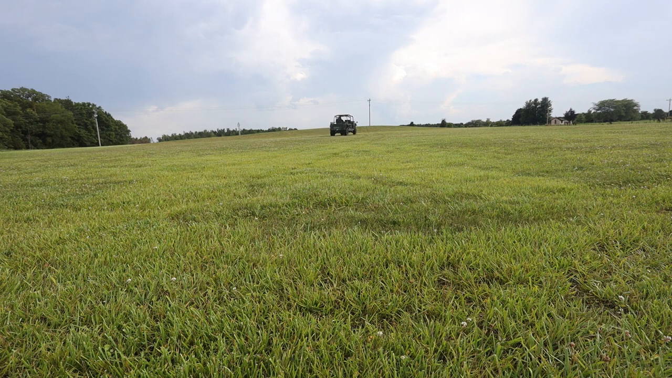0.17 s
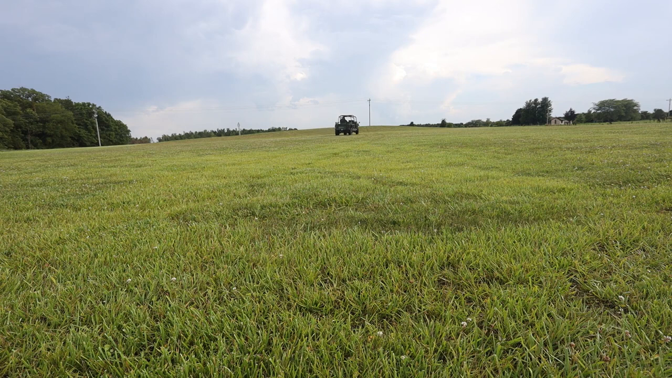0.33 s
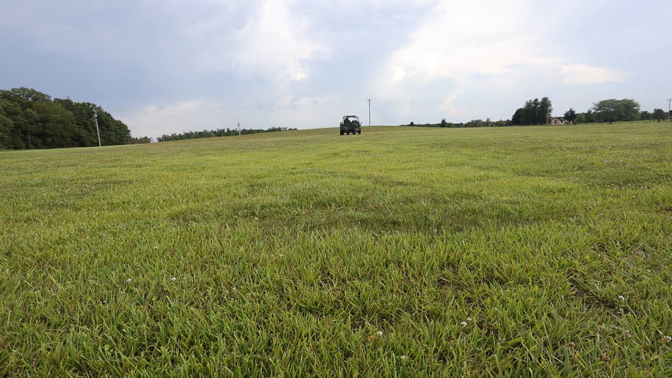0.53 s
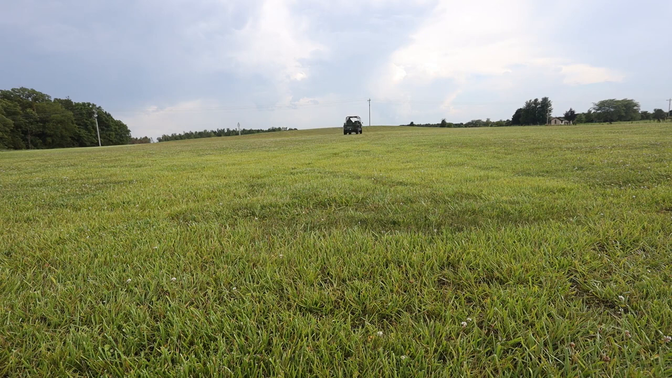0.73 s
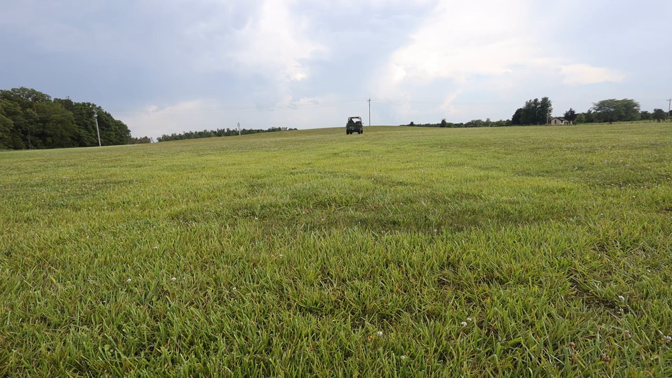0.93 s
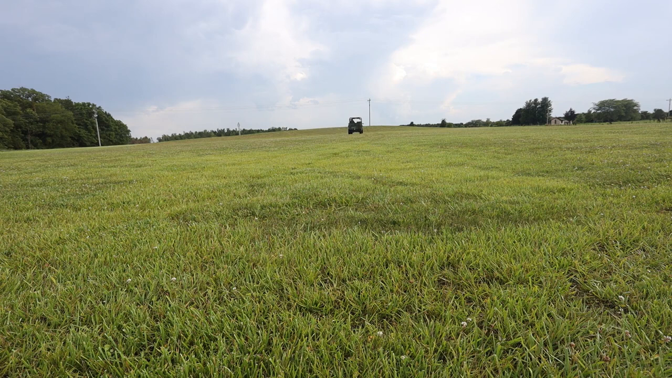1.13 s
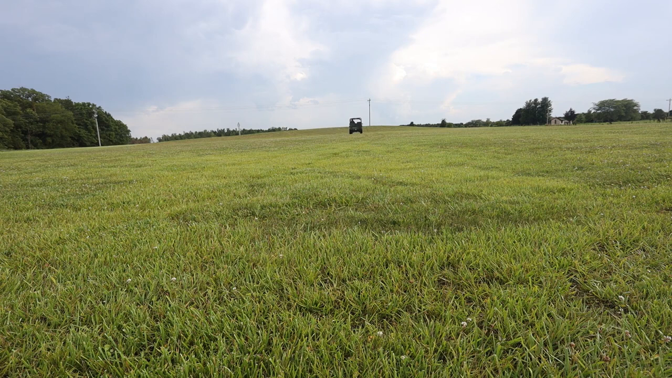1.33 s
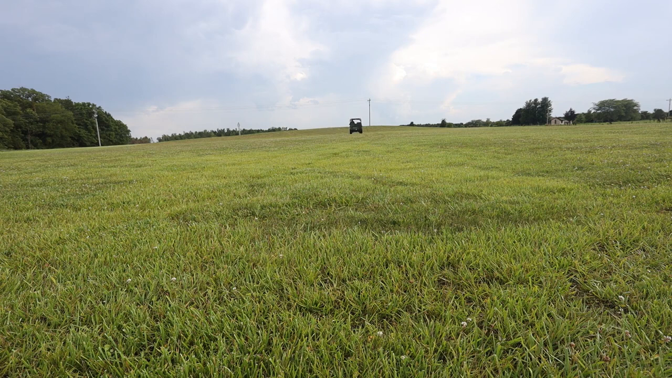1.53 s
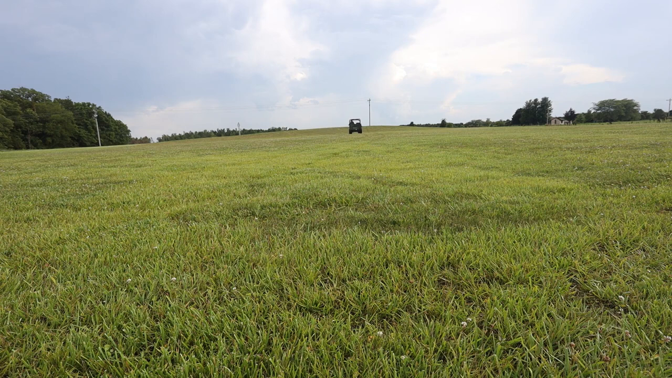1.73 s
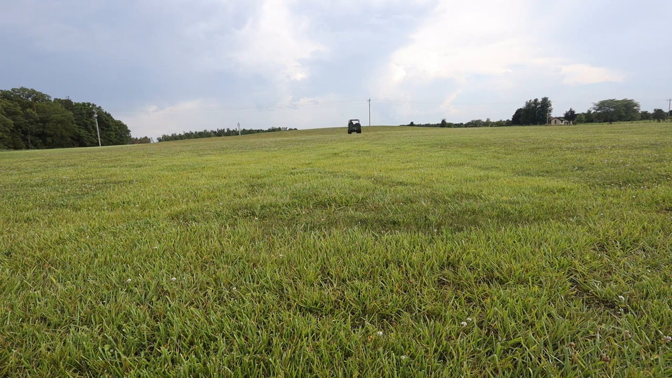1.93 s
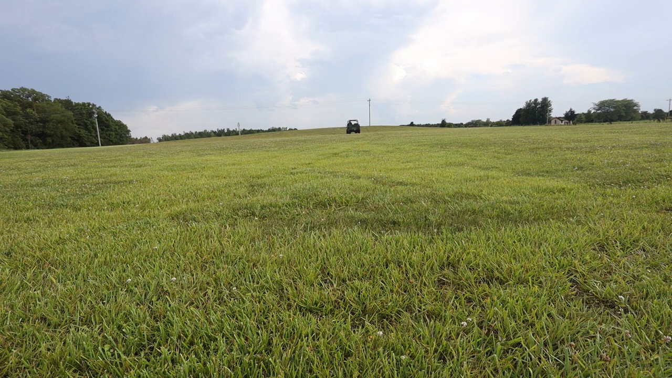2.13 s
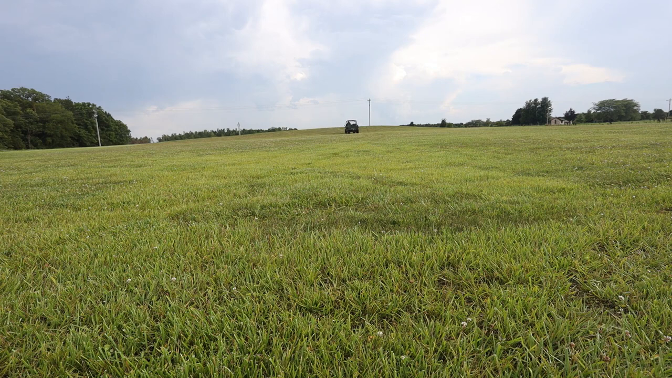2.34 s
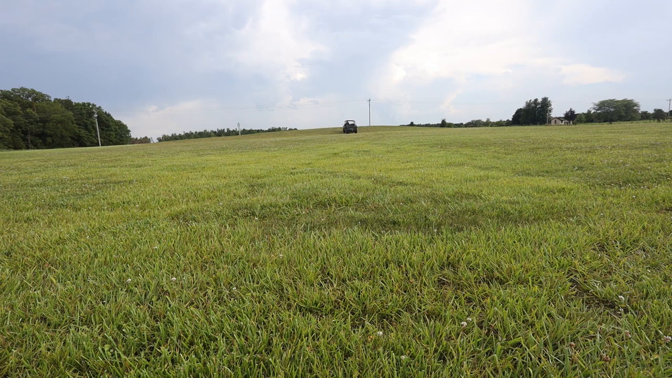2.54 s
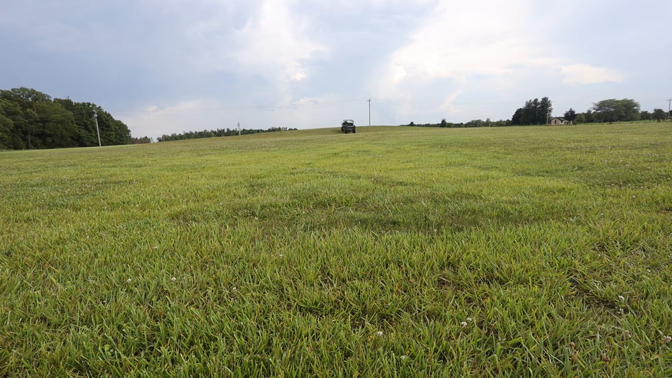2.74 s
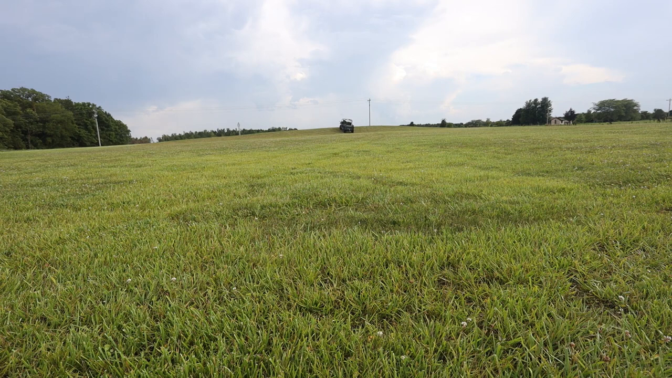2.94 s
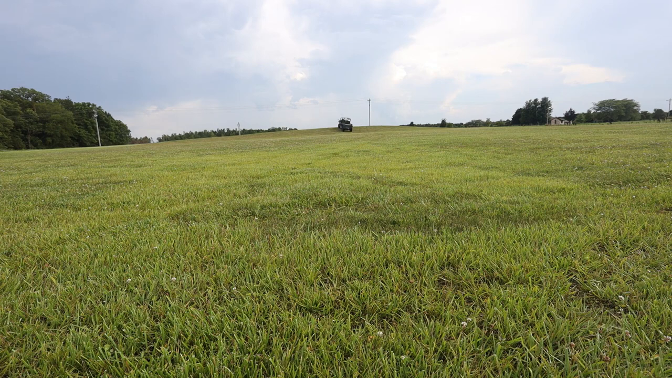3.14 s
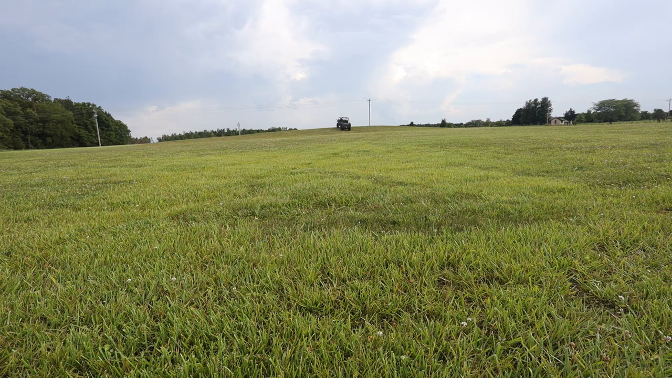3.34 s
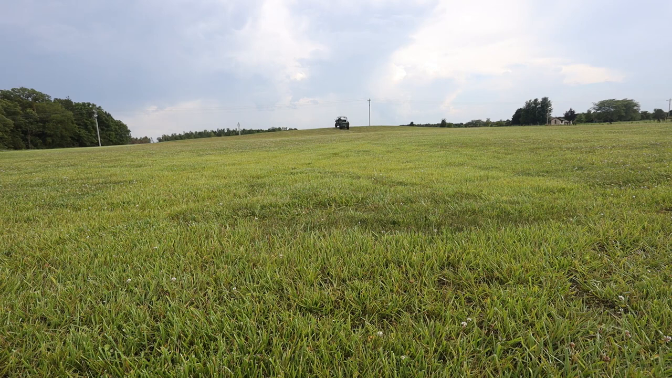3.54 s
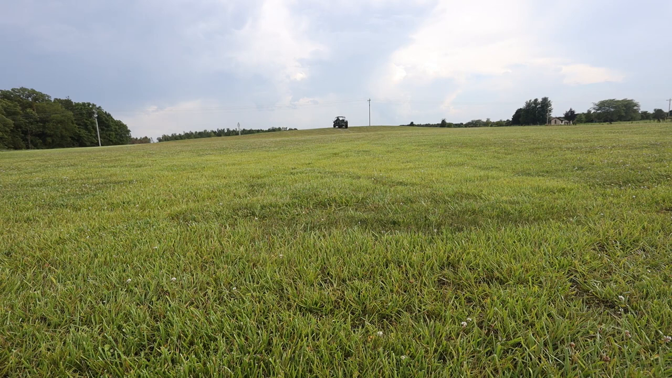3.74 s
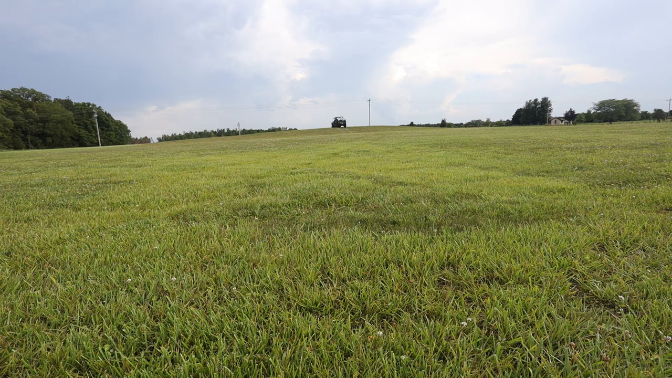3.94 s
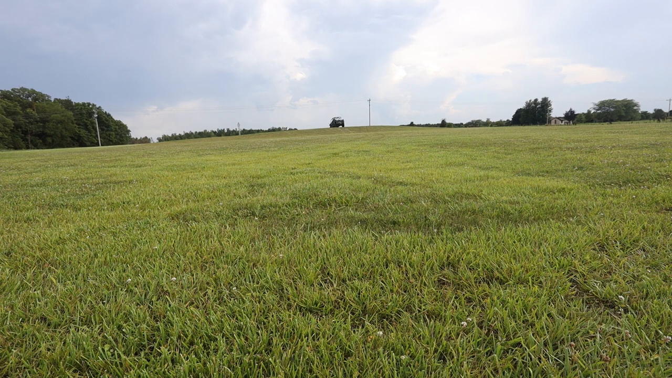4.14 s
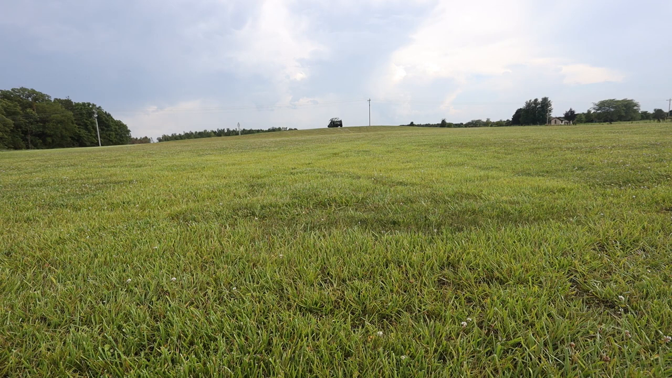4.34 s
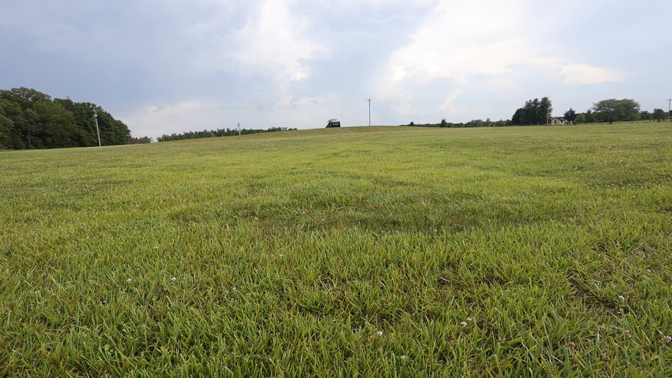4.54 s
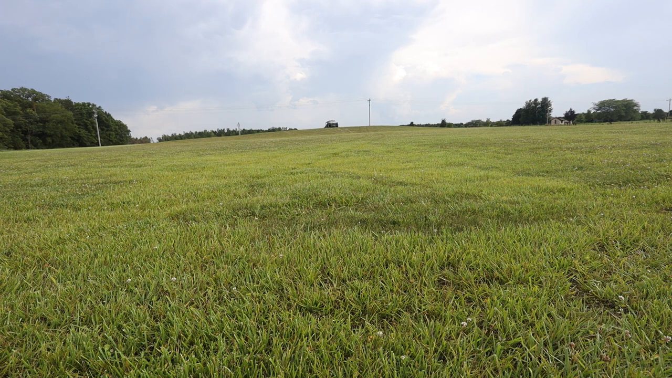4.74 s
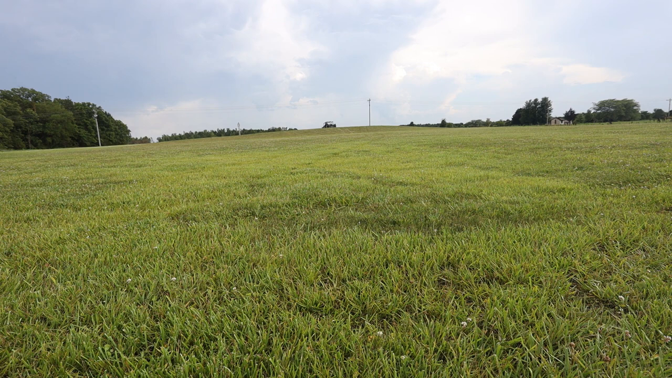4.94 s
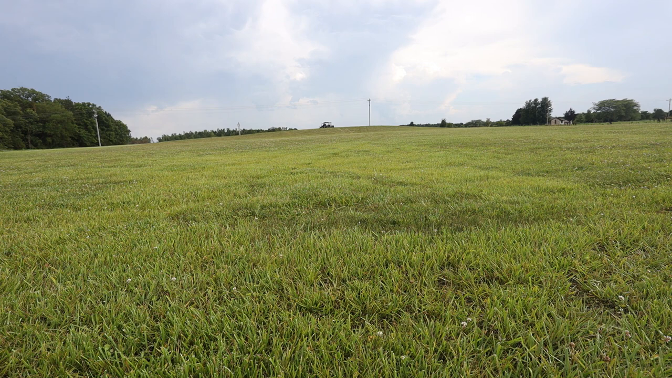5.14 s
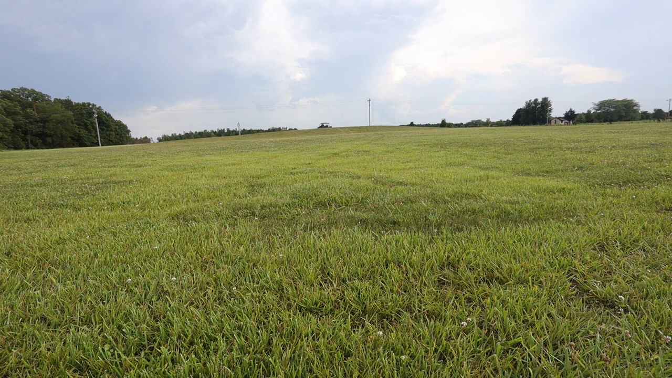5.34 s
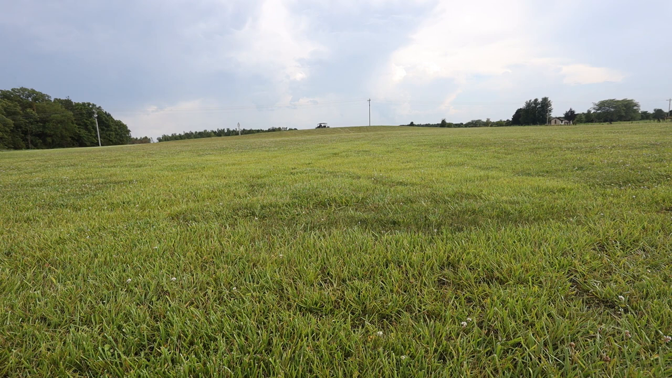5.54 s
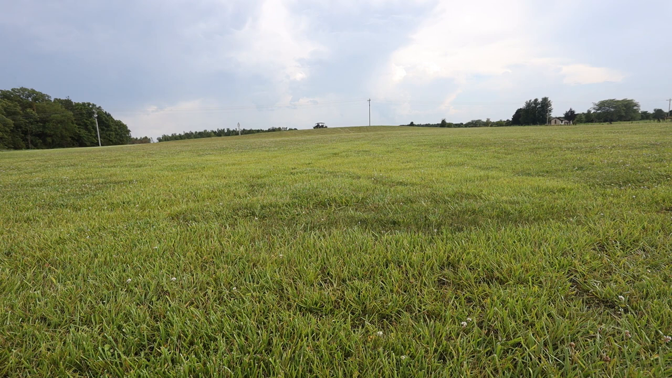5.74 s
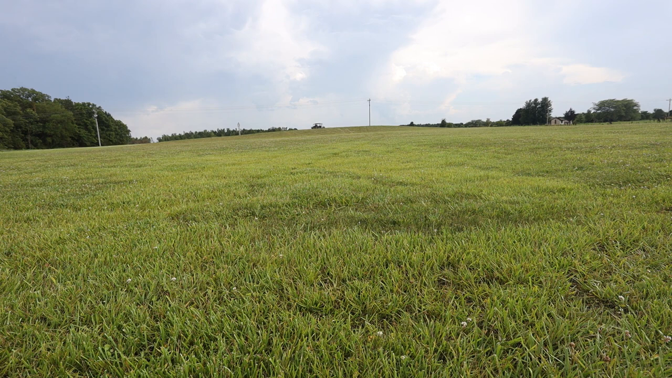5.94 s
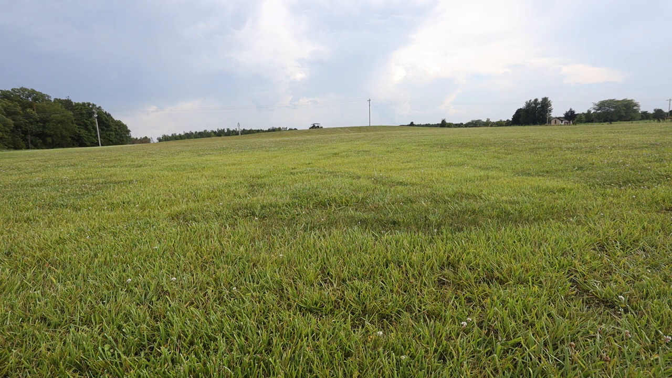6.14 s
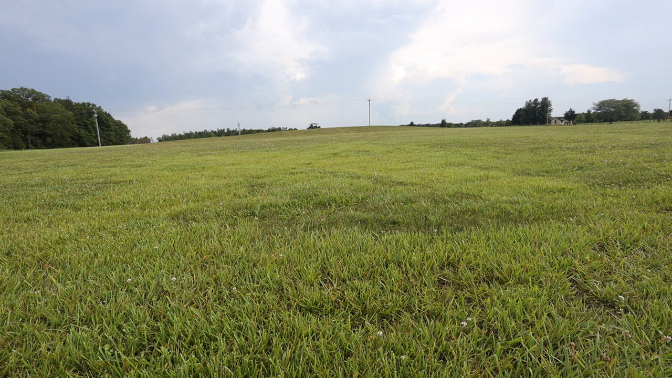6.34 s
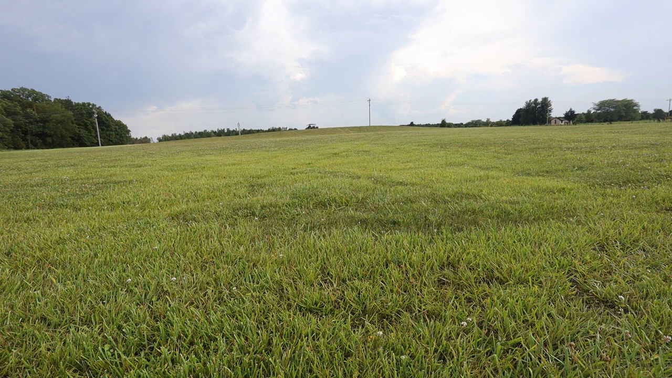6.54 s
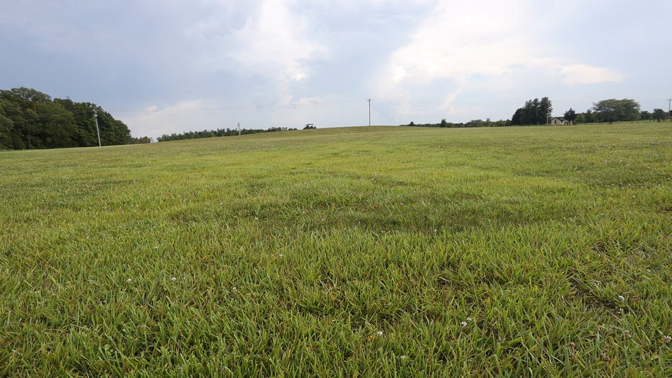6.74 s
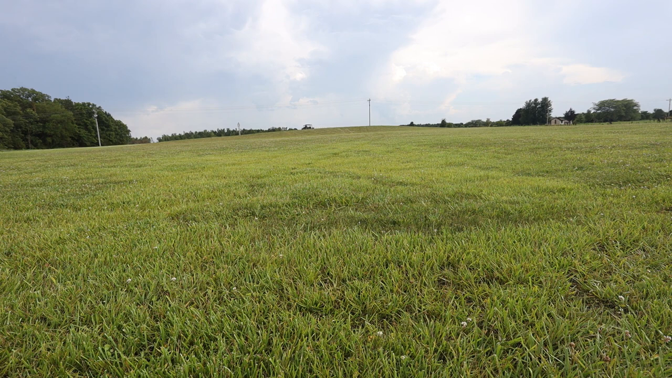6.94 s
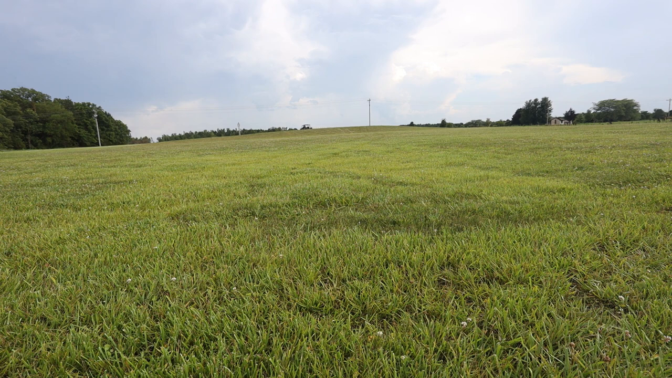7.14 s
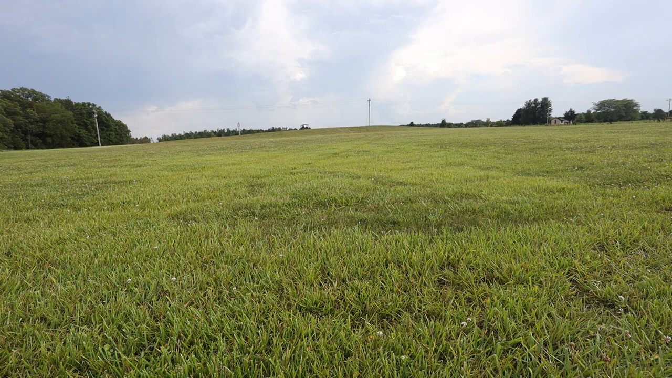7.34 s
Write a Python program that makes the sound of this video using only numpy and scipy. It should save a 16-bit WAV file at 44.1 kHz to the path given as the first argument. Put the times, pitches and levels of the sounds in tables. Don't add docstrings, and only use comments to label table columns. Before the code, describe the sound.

A rough four-cylinder off-road vehicle growls away across grass, eases off to a low idle-like rumble, then revs again amid sharp bodywork rattles.

```python
import sys
import numpy as np
from scipy import signal
from scipy.io import wavfile
from scipy.ndimage import uniform_filter1d

SR = 44100
rng = np.random.default_rng(int(sys.argv[2]) if len(sys.argv) > 2 else 0)


def transcribe(u):
    v = np.clip(np.atleast_2d(u).T, -1, 1)
    q = np.round(v * 32767).astype(np.int16)
    wavfile.write(sys.argv[1], SR, q)


def volts_from_db(level):
    exponent = np.asarray(level, float) / 20
    return 10 ** exponent


N = 329868
T = np.arange(N) / SR

# time_s, firings_per_s
FIRING_RATE = [(0, 49.5), (1.94, 45.6), (2.37, 43.6), (2.6, 39.3), (2.98, 37.8), (3.54, 30.5), (3.93, 28.9),
               (4.13, 32.3), (4.68, 53.6), (4.94, 56), (5.22, 60.7), (5.55, 62.3), (5.79, 58), (6.23, 62.2),
               (6.43, 56.7), (6.66, 58), (7.15, 50.3), (7.48, 49.3)]
# time_s, level_db
THROTTLE = [(0.0, 0.4), (0.61, 2.0), (1.09, 1.9), (1.29, 0.1), (2.35, -2.2), (2.53, -7.7), (3.01, -10.6),
            (3.56, -16.3), (3.98, -13.3), (4.21, -4.4), (4.66, -3.4), (5.18, -6.9), (5.8, -8.3),
            (6.32, -9.0), (6.46, -5.4), (7.06, -9.7), (7.21, -12.8), (7.48, -13.1)]
# time_s, level_db
FACING = [(0, -1.5), (.9, 0), (1.4, -3), (1.9, -5), (2.5, -12.5), (3.1, -12.5), (3.6, -9.5), (4.1, -9.5),
          (4.46, -9.5), (4.8, -13), (5.4, -13.5), (5.9, -13.5), (6.3, -13.5), (6.6, -13.5), (6.9, -18),
          (7.2, -14.5), (7.48, -19.5)]
# time_s, level_db,
# half_width_s
SURGES = [(1.65, 1, 0.27), (2.7, -1.5, 0.37), (3.12, 0, 0.093), (3.72, 4, 0.053), (4.0, 1.5, 0.1),
          (4.42, 2, 0.036), (5.3, -0.5, 0.27), (6.37, 5, 0.11), (6.67, 5, 0.14), (6.95, 1, .15),
          (7.21, 3, 0.055)]
# time_s, edge_hz
GRASS_EDGE = [(0, 700), (.6, 695), (1.5, 660), (2.3, 630), (3, 530), (4.5, 490), (6, 480), (7.48, 520)]
DOUBLING_S = 2.03
LIFT_S, LIFT_TAKES_S = 2.43, 0.19

ORDER_LEVELS = [-33, -23.5, -19, -29.5]
THROTTLE_SHARE = [.72, 1.05, 1.31, .1]
ORDER_WAVER = [.6, .7, .7, 1.8]
# pitch_hz, level_db
TAILPIPE = [(28, -5.4), (50, -2.6), (70, 5.6), (100, -3.0), (150, 3.9), (250, -7)]
# pitch_hz, width_hz, level_db
SILENCER = [(61.8, 3.0, 5.4), (123.5, 4.7, -5.0), (142.8, 12.7, -5.4), (201.0, 10.1, -12.4),
            (101.8, 3.7, 3.3), (168.1, 8.1, -2.0)]
QUARTER_LEVELS = [-4, -6, -6, -1]
SMOOTH_FLUTTER, ROUGH_FLUTTER = .011, .033

# pitch_hz, level_db
PIPE = [(20, -96), (45, -17), (80, -6.5), (130, 0.5), (190, -3), (240, -2.5), (290, -6), (370, -11),
        (430, -15), (500, -21.5), (700, -72.5), (1500, -110)]
# pitch_hz, level_db
UPPER = [(250, -40), (360, -4.5), (450, -5), (600, -6), (750, -7.5), (900, -6.5), (1150, -14), (1500, -68),
         (3000, -100)]
# pitch_hz, level_db
BLOCK = [(440, -28), (750, -15), (884, -13), (1180, -5.5), (1340, -4), (1460, -15), (1580, -0.5),
         (1820, -3), (2020, -6.5), (2220, -3), (3250, -2.5), (4320, -5.5), (4840, -17.5), (5270, -21.5),
         (5900, -39), (7670, -28), (13000, -120)]
# pitch_hz, level_db
FAN = [(2880, -13), (4900, -8.5), (5230, 0.5), (5940, -4), (8030, -3), (9300, -6), (10300, -16.5),
       (12000, -19), (13000, -60)]
# pitch_hz, width_hz, level_db
SUMP = [(1476, 164, 10.5), (1760, 450, 5), (1250, 120, -2)]
# pitch_hz, width_hz, level_db
CAB = [(150, 40, 0), (190, 30, 0), (370, 50, -9)]
# time_s, depth_0_to_1
PULSING = [(0, 0.35), (1.5, 0.61), (2.5, 0.5), (3.4, 0.84), (4.0, 0.94), (4.25, 0.73), (5.3, 0.2), (6, 0.6),
           (7.48, 0.5)]

# level_db, then shares of throttle, facing, distance loss and surges
ROAR = (-26.5, 0.51, 0.17, 0.16, 1.09)
UPPER_ROAR = (-36.5, 0.16, 0.16, 0.54, 1.18)
CLATTER = (-33, -0.1748, 1.0635, 0.2, -0.28)
HISS = (-46, 0.15, 0.62, .8, 0.6)
KNOCK_RING = (-41.5, .25, 0.77, .01, 1.03)
# time_s, level_db, half_width_s
LULLS = [
    (.6, -3, .12),
    (1.1, -2, .08),
    (1.6, -5.5, 0.24),
    (2.05, -5, .15),
]

# start_s, length_s, pitch_hz, sag_hz_per_s, level_db
GEARS = [
    (-.1, .52, 603, 17, -41),
    (.3, .5, 645, 30, -48),
    (.98, 1.0, 543, 30, -42),
    (.1, .9, 236, 9, -37),
]
# start_s, length_s, pitch_hz, sag_hz_per_s, level_db
TURBO = [
    (-.3, .9, 13170, 1230, -73),
    (.62, 1.0, 12160, 1200, -72),
]
# start_s, length_s, pitch_hz, sag_hz_per_s,
# level_db
COVERS = [
    (.55, 0.96, 1460, 30, -42.5),
    (.72, 0.2, 1850, 10, -42),
    (1.32, 0.49, 1880, 100, -42),
    (.4, 0.43, 1400, 10, -52),
    (4.2, 0.83, 1500, 10, -50),
]

# start_s, peak_db, ring_hz, shaking_s
RATTLES = [(3.1907, -34, 1660, .012), (3.3205, -31, 1790, 0.0091), (3.4161, -22.5, 2530, 0.019),
           (3.4502, -25, 1600, 0.019), (4.1887, -30.5, 1270, .031), (4.3226, -32, 1490, .009),
           (4.4715, -19.5, 1580, 0.012), (4.6199, -15, 3520, 0.01), (4.644, -22.5, 1500, 0.013),
           (4.8883, -22.5, 1210, 0.022), (4.9748, -27.5, 2940, 0.0069), (5.322, -31, 3100, .03),
           (5.426, -32, 3700, 0.031), (5.7183, -33.5, 1280, .03), (6.1378, -30.5, 1250, 0.023),
           (6.1687, -33, 1700, 0.035), (6.334, -35, 1820, 0.015), (6.571, -32.5, 3090, 0.016),
           (6.6658, -26.5, 3390, 0.026), (6.679, -23, 1350, 0.028), (6.6994, -23, 2830, .011),
           (6.736, -27, 1800, 0.009), (6.7776, -26.5, 2650, .027), (6.841, -27, 2800, 0.0057),
           (6.9057, -33, 4070, .02), (7.1766, -31, 3280, 0.021), (7.1952, -20.5, 1760, 0.026),
           (7.2206, -29.5, 1800, 0.027), (7.313, -24.5, 2860, 0.017), (7.4506, -29, 1220, 0.014)]
# start_s, level_db, pitch_hz, t60_s
THUMPS = [
    (7.192, -11.5, 266, 0.089),
]
# start_s, pitch_hz, length_s, level_db
SQUEAKS = [
    (5.425, 1840, .035, -42),
    (7.16, 3620, .06, -57),
    (6.19, 1950, .025, -48),
    (4.03, 2700, .015, -53),
]
# start_s, peak_db, pitch_hz
TICKS = [(0.135, -46, 9200), (0.375, -44, 10000), (0.5442, -46, 9100), (0.9173, -42, 7400),
         (1.28, -45, 7900), (1.365, -49, 7890), (1.9051, -50, 9100), (3.3164, -49, 7430),
         (4.1026, -48, 6270), (4.5885, -52, 7640), (5.3283, -47, 7070), (6.3894, -50, 7870),
         (6.5774, -45.5, 8300), (6.6837, -43, 6910), (6.7356, -49, 7370), (7.1656, -46, 7250),
         (7.3128, -43, 8100)]
PANEL_T60_S, PANEL_TREBLE_DB = 0.095, -24

# pitch_hz, level_db
WIND = [(8, -6), (25, 0), (45, -3), (90, -20), (200, -60), (400, -110)]
# pitch_hz, level_db
AIR = [(2940, -33), (5000, -3), (5720, -2), (7240, -2), (15200, -6), (16200, -20), (16500, -44)]
# pitch_hz, level_db
HOUSING = [(4400, 0), (4750, 0.5), (4880, -7), (5000, 2.5), (5250, 3.5), (5700, 0.5)]


def evened(x):
    return x / np.sqrt(np.mean(x ** 2) + 1e-20)


def noise(length=N):
    return rng.standard_normal(length)


def curves(rows):
    s, *columns = np.transpose(rows)
    return [np.interp(T, s, c) for c in columns]


def swells(rows):
    return sum(db * np.exp(-((T - s) / width) ** 2) for s, db, width in rows)


def wander(top_hz):
    knots = np.arange(0, N / SR + 1, .01)
    slow = 0
    for f in np.geomspace(.3, top_hz, num=24):
        slow = slow + np.sin(2 * np.pi * (f * knots + rng.random())) / np.sqrt(f)
    return np.interp(T, knots, evened(slow))


def read(points, hz):
    f, value = np.transpose(points)
    return np.interp(np.log(hz + 1), np.log(f + 1), value)


def colour(x, points):
    log_gain = np.log(volts_from_db(read(points, abs(np.fft.fftfreq(8192, 1 / SR)))))
    taps = np.fft.ifft(np.exp(np.conj(signal.hilbert(log_gain)))).real[:4096]
    return signal.oaconvolve(x, taps)[:len(x)]


def resonate(x, hz, width):
    turn = np.exp(2j * np.pi * np.cumsum(hz * np.ones(len(x))) / SR)
    r = np.exp(-np.pi * width / SR)
    return 2 * (turn * signal.lfilter([1 - r], [1, -r], x / turn)).real


def body(x, modes):
    total = 0
    for hz, width, db in modes:
        total = total + volts_from_db(db) * resonate(resonate(x, hz, width), hz, width)
    return evened(total)


def add(mix, s, sound):
    at = round(s * SR)
    part = mix[max(at, 0):][:len(sound) + min(at, 0)]
    part += sound[max(-at, 0):][:len(part)]


def still_air():
    return volts_from_db(-61) * evened(colour(noise(), AIR))


def wind():
    return volts_from_db(-52 + 2 * wander(4.3)) * evened(colour(noise(), WIND))


def over_grass(x):
    hz, t, z = signal.stft(x, SR, nperseg=1024)
    edge_hz = np.interp(t, *np.transpose(GRASS_EDGE))
    above_edge = 1 / (1 + np.exp(-(hz[:, None] - edge_hz) / 30))
    below_top = 1 / (1 + np.exp((hz[:, None] - 1.93 * edge_hz) / 50))
    return signal.istft(z * volts_from_db(-14 * above_edge * below_top), SR, nperseg=1024)[1][:N]


def tick(db, hz):
    t = np.arange(SR // 4) / SR
    return volts_from_db(db - 5.5 - 60 * t / 0.092) * body(noise(len(t)), [(hz, 2000, 0)])


def squeak(hz, length, db):
    t = np.arange(0, length, 1 / SR)
    turns = hz * t + 0.076 * np.cumsum(noise(len(t))) / np.sqrt(SR * 0.016)
    tone = np.sin(2 * np.pi * turns) + 1.13 * np.sin(4 * np.pi * turns)
    if hz < 2500:
        tone += 0.33 * np.sin(6 * np.pi * turns)
    return volts_from_db(db) * np.hanning(len(t)) * tone


def thump(db, hz, t60):
    t = np.arange(SR // 4) / SR
    boom = np.sin(2 * np.pi * hz * t) + 0.54 * np.sin(2 * np.pi * hz * 0.56 * t)
    return volts_from_db(db - 60 * t / t60) * boom * np.minimum(t / 0.0106, 1)


def rattle(db, hz, shake):
    t = np.arange(SR // 6) / SR
    knocks = rng.random(len(t)) < 250 / SR
    hits = 1 + uniform_filter1d(knocks * 55., size=50) * np.exp(-t / (shake + .01))
    drive = noise(len(t)) * hits * volts_from_db(-60 * np.maximum(t - shake, 0) / PANEL_T60_S)
    drive[:12] += 4.5 * np.hanning(12)
    rings = 0
    for ratio, gain in ((1, 0.44), (0.52, 0.31), (.71, 0.18)):
        rings = rings + gain * evened(resonate(drive, hz * ratio, 95))
    broad = drive + 1.2 * resonate(drive, hz, 1500)
    panel = evened(colour(broad, BLOCK)) + .48 * evened(colour(rings, BLOCK))
    sound = evened(panel) + volts_from_db(PANEL_TREBLE_DB) * evened(colour(drive, FAN))
    return volts_from_db(db) * sound / abs(sound).max()


def whine(length, hz, sag, db, fuzz, breadth):
    t = np.arange(0, length, 1 / SR)
    glide = hz - sag * t
    steady = np.sin(2 * np.pi * np.cumsum(glide) / SR)
    tone = steady + fuzz * body(noise(len(t)), [(glide, breadth * hz, 0)])
    return volts_from_db(db) * np.sin(np.pi * (t / length) ** .55) * evened(tone)


def after_lift():
    return 1 / (1 + np.exp((LIFT_S - T) / LIFT_TAKES_S))


def cab_boom(shaking):
    level_db = -49.5 + 9 * after_lift() + 0.6 * np.maximum(swells(SURGES), 0)
    return volts_from_db(level_db) * body(shaking, CAB)


def layer_levels(throttle_db):
    facing_db, surge_db = curves(FACING)[0], swells(SURGES)
    distance_db = -20 * np.log10(1 + T / DOUBLING_S)
    levels = []
    for db, throttle, facing, distance, surges in (ROAR, UPPER_ROAR, CLATTER, HISS, KNOCK_RING):
        level = db + throttle * throttle_db + facing * facing_db + distance * distance_db
        levels.append(level + surges * surge_db + .6 * wander(6))
    return levels


def fan_hiss(gate, level_db):
    return volts_from_db(level_db + swells(LULLS)) * evened(colour((0.15 + 1.6 * gate) * noise(), FAN))


def firing_pulses(turns):
    depth = np.clip(curves(PULSING)[0], 0, 1)
    size = volts_from_db(1.43 * noise(600))[turns.astype(int)]
    u = (turns % 1) / 0.28
    gate = uniform_filter1d(1 - depth + 2.1 * depth * size * u * np.exp(-u), size=120)
    return gate / np.sqrt(uniform_filter1d(gate ** 2, size=9000)) * volts_from_db(.7 * wander(15))


def clatter(gate, level_db):
    return volts_from_db(level_db) * evened(colour(gate * noise(), BLOCK))


def sump_ring(gate, level_db):
    return volts_from_db(level_db) * body(gate * noise(), SUMP)


def rumble_noise():
    return evened(colour(noise(), [(700, 0), (1500, -20)]))


def uneven_firings(turns):
    flutter = SMOOTH_FLUTTER + (ROUGH_FLUTTER - SMOOTH_FLUTTER) * after_lift()
    cycle = (turns + flutter * wander(30)) / 4
    lines = 0
    for k in range(1, 54):
        if k % 4 or k > 16:
            level = volts_from_db(QUARTER_LEVELS[k % 4] + 3.4 * wander(9))
            lines = lines + level * np.cos(2 * np.pi * (k * cycle + rng.random()))
    return evened(lines)


def upper_roar(lines, gate, level_db):
    mixed = 0.32 * lines + (0.5 + 0.29 * gate) * rumble_noise()
    return volts_from_db(level_db) * evened(over_grass(colour(mixed, UPPER)))


def exhaust_levels(rate_hz, throttle_db):
    hz = rate_hz * np.arange(1, 5)[:, None]
    pipe_db = read(TAILPIPE, hz)
    for f, width, db in SILENCER:
        pipe_db = pipe_db + db * np.exp(-((hz - f) / width) ** 2)
    return [THROTTLE_SHARE[k] * throttle_db + pipe_db[k] + ORDER_LEVELS[k] + ORDER_WAVER[k] * wander(6.9)
            for k in range(4)]


def exhaust_orders(turns, levels_db):
    total = 0
    for k, db in enumerate(levels_db):
        phase = 2 * np.pi * (k + 1) * turns + 0.95 * k + 0.48 * wander(1.8)
        total = total + np.sqrt(2) * volts_from_db(db) * np.cos(phase)
    return total


def scene():
    rate_hz = uniform_filter1d(curves(FIRING_RATE)[0], size=2600)
    turns = np.cumsum(rate_hz) / SR + .5
    throttle_db = curves(THROTTLE)[0]
    roar_db, upper_db, clatter_db, fan_db, knock_db = layer_levels(throttle_db)
    lines, gate, rumble = uneven_firings(turns), firing_pulses(turns), rumble_noise()

    mix = still_air() + wind()
    for s, *row in TICKS:
        add(mix, s, tick(*row))
    for s, *row in SQUEAKS:
        add(mix, s, squeak(*row))
    for s, *row in THUMPS:
        add(mix, s, thump(*row))
    for s, *row in RATTLES:
        add(mix, s, rattle(*row))
    for rows, fuzz, breadth in ((GEARS, .4, .012), (TURBO, 2, .008), (COVERS, 20, .07)):
        for s, *row in rows:
            add(mix, s, whine(*row, fuzz, breadth))
    mix += cab_boom(lines + rumble)
    mix += fan_hiss(gate, fan_db)
    mix += clatter(gate, clatter_db)
    mix += sump_ring(gate, knock_db)
    mix += upper_roar(lines, gate, upper_db)
    mix += volts_from_db(roar_db) * evened(colour(lines + .55 * rumble, PIPE))
    mix += exhaust_orders(turns, exhaust_levels(rate_hz, throttle_db))
    return mix[None]


def low_pass(x):
    return signal.sosfilt(signal.butter(12, 16990, fs=SR, output="sos"), x)


def record(dry):
    edge = signal.firwin(801, 15790, window=("kaiser", 9), fs=SR)
    housed = colour(dry[0], HOUSING)[None]
    limited = signal.oaconvolve(housed, edge[None], "same")
    return low_pass(limited * np.minimum(T * 500, 1))


dry = scene()
out = record(dry)
transcribe(out)
```